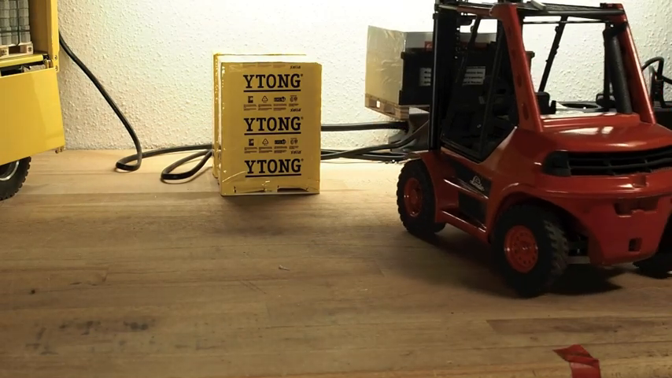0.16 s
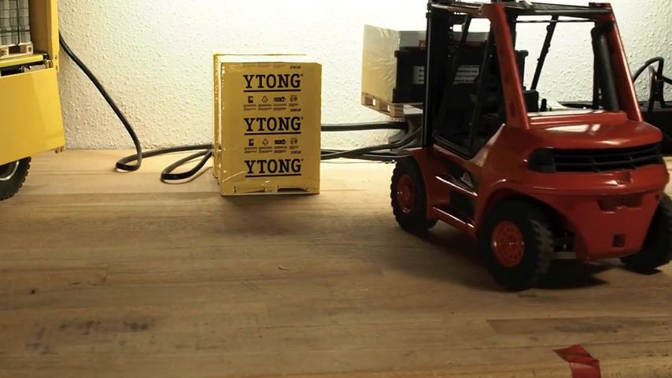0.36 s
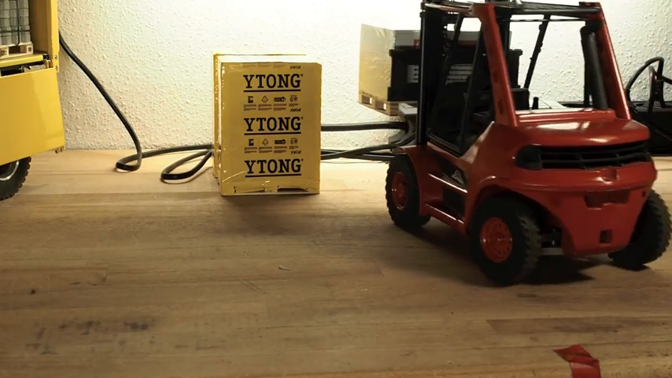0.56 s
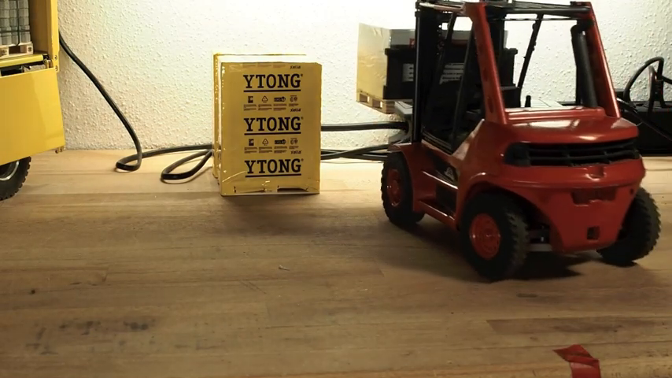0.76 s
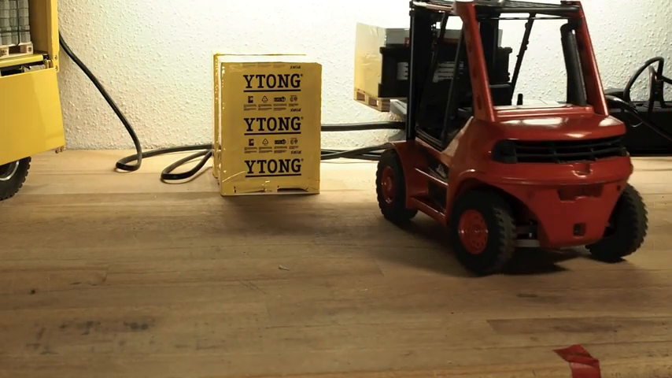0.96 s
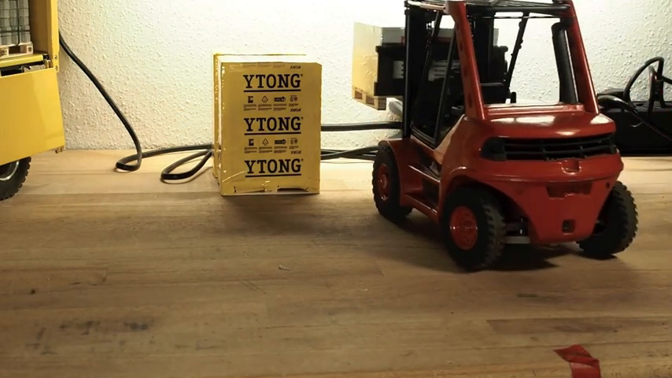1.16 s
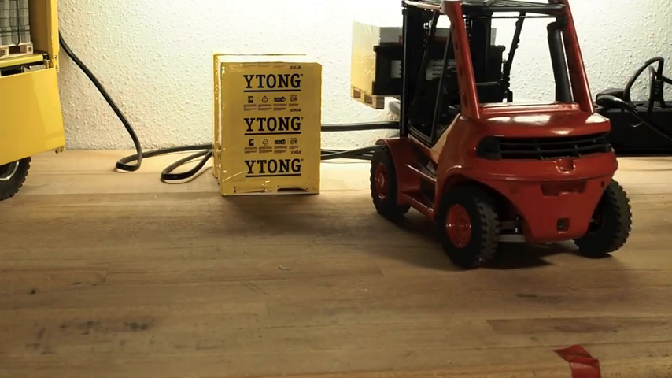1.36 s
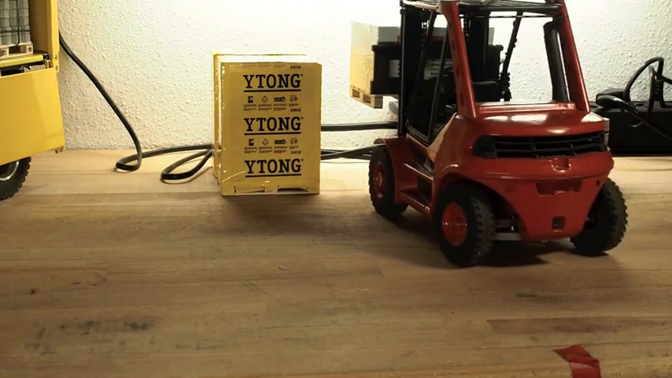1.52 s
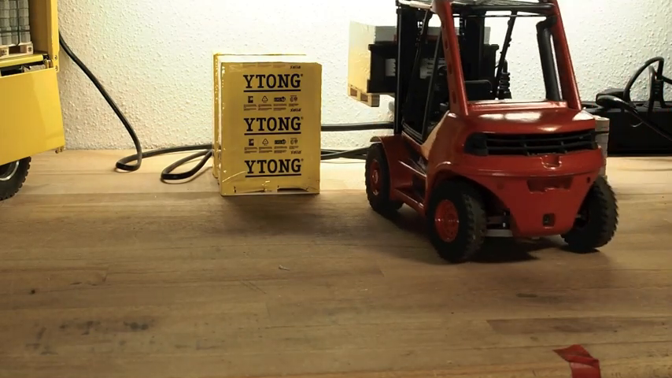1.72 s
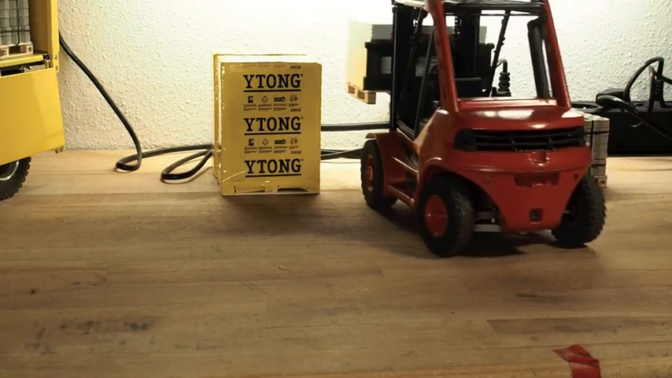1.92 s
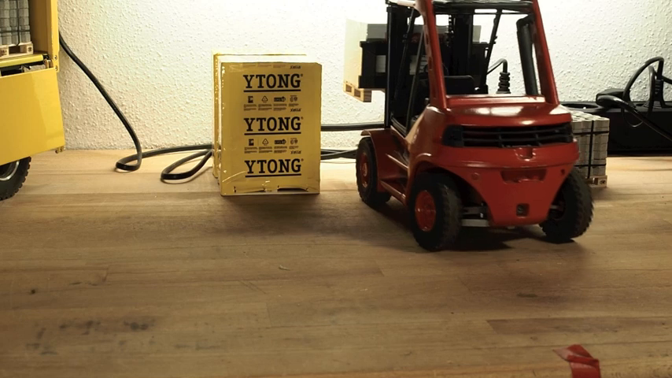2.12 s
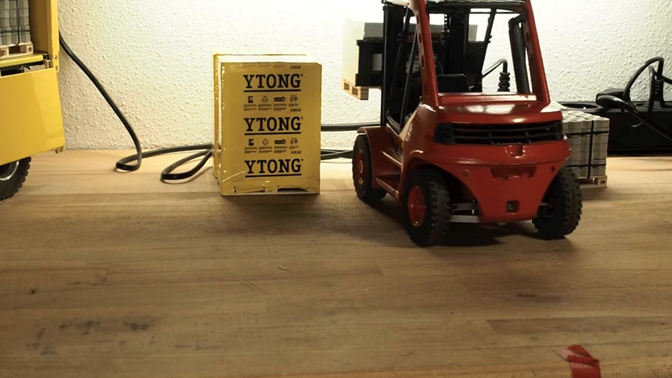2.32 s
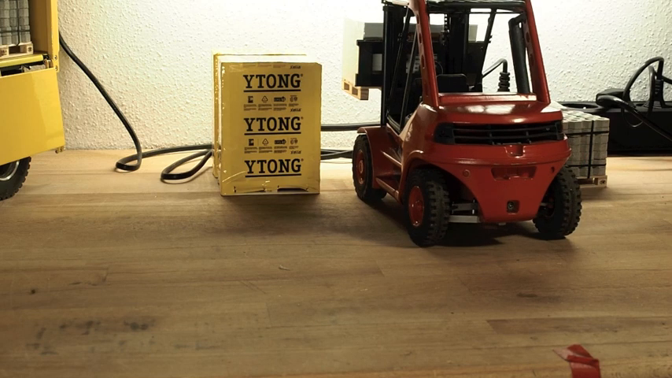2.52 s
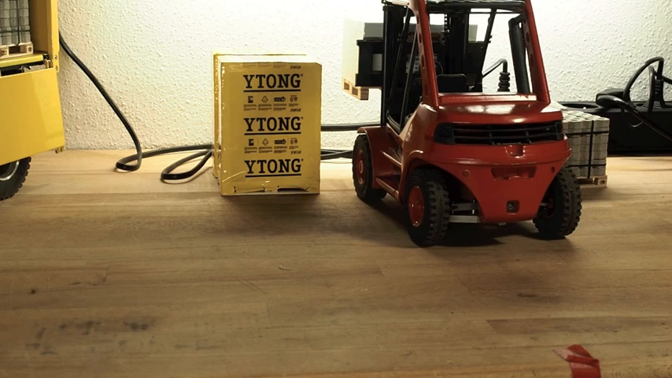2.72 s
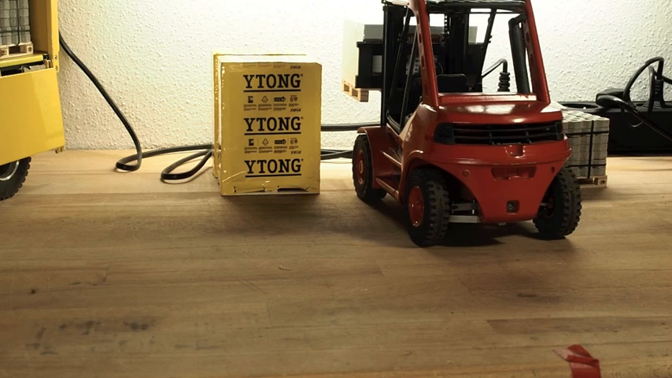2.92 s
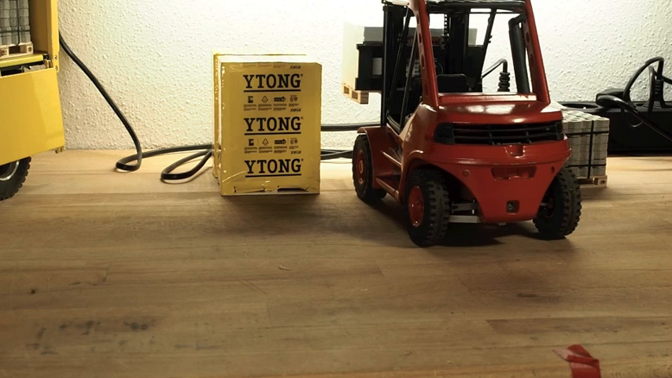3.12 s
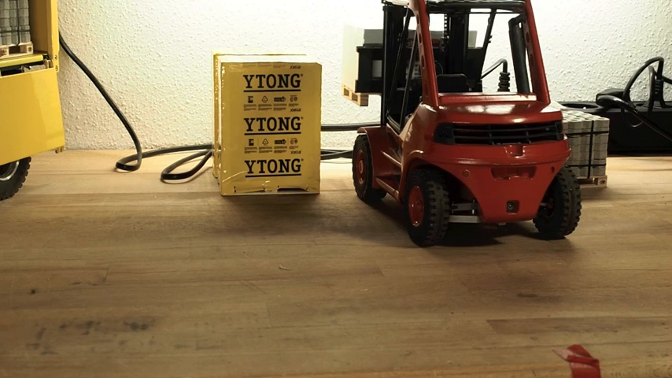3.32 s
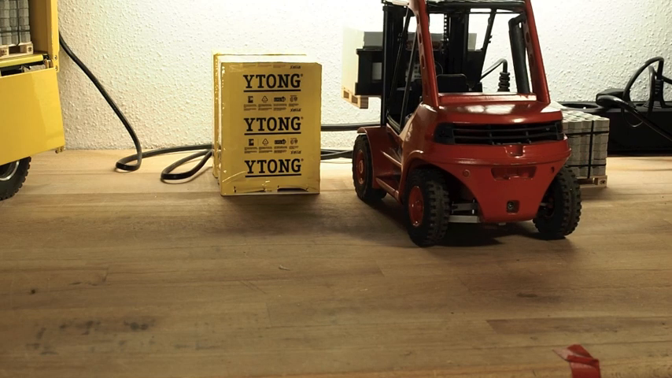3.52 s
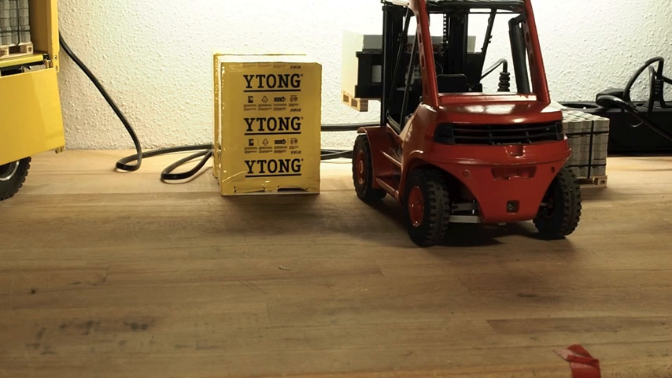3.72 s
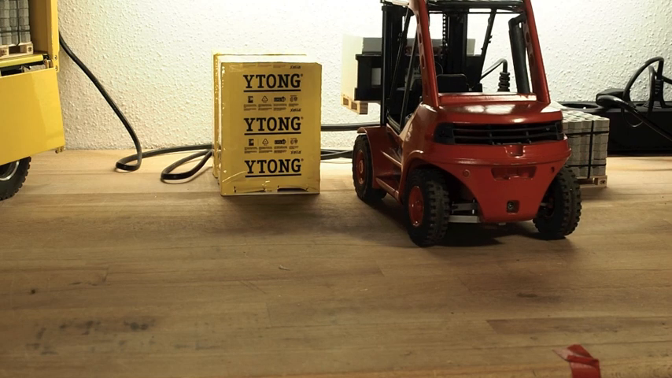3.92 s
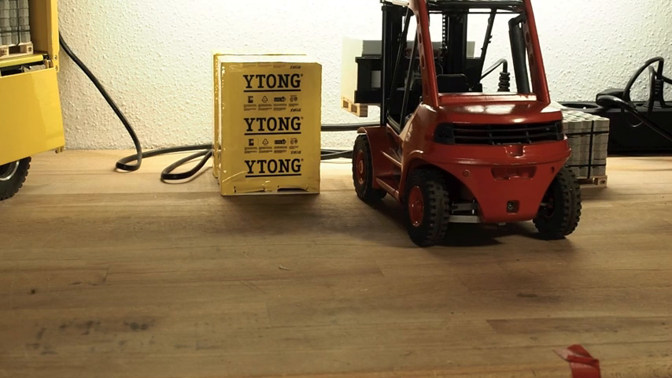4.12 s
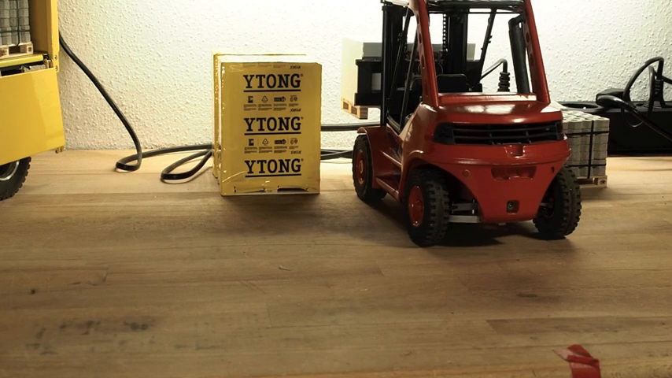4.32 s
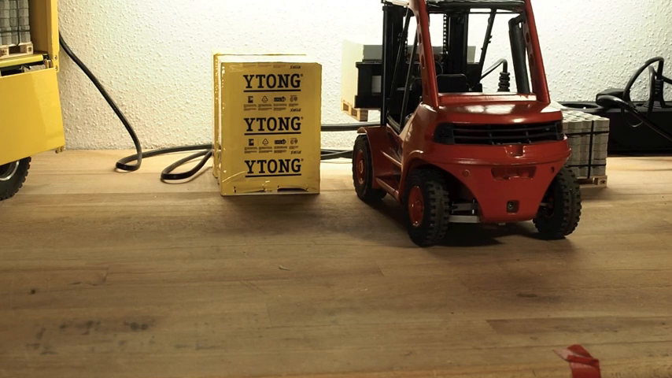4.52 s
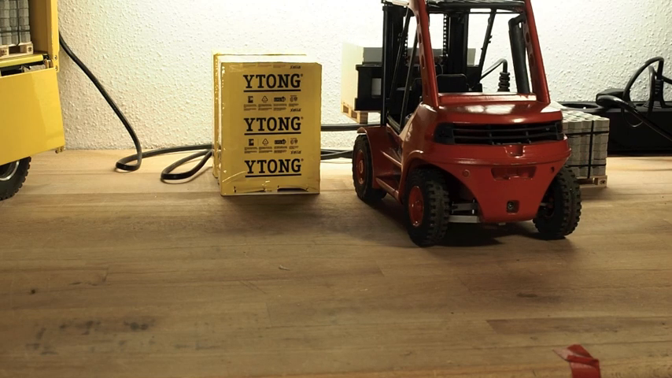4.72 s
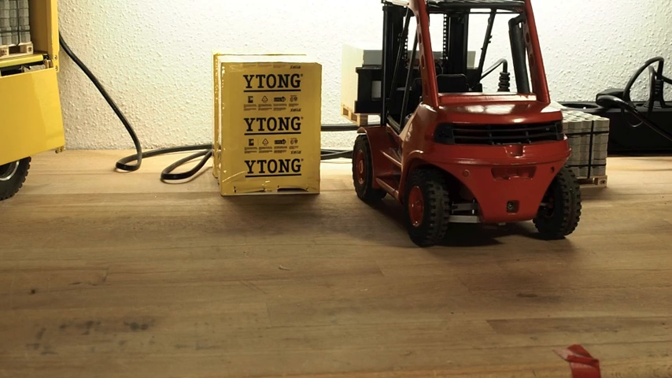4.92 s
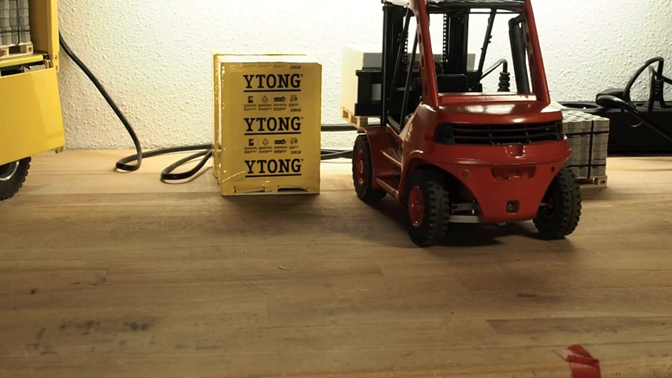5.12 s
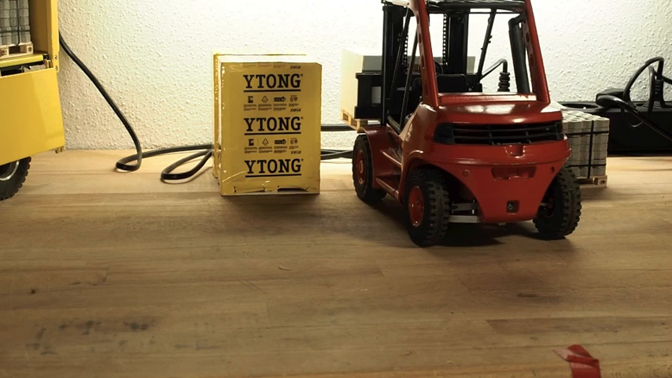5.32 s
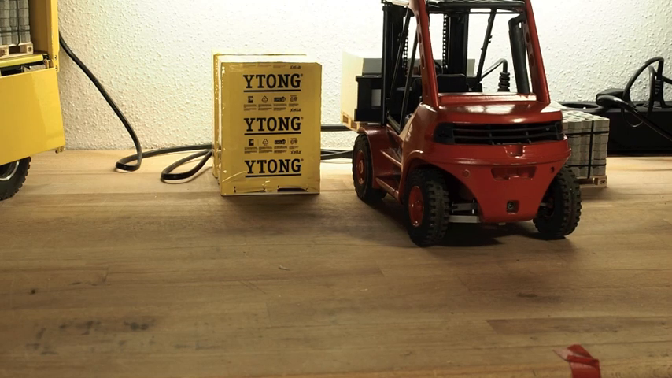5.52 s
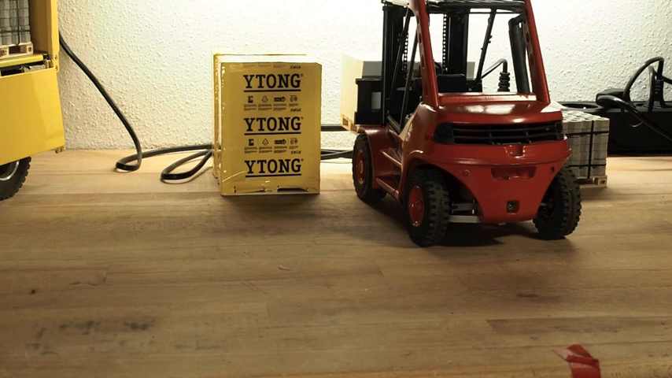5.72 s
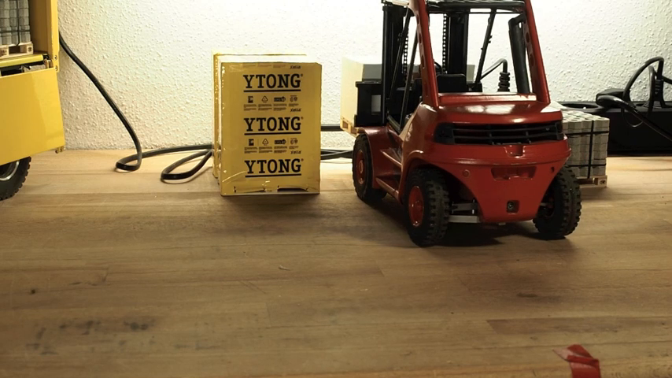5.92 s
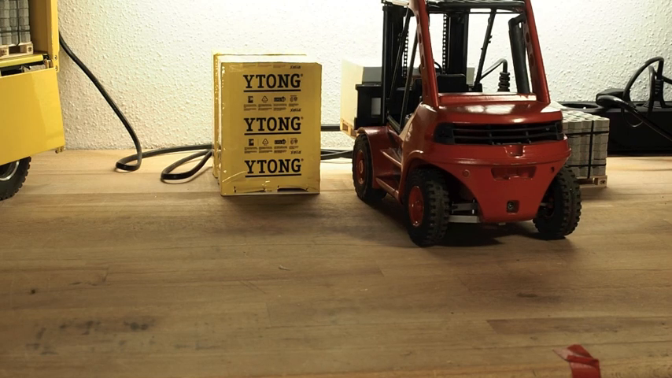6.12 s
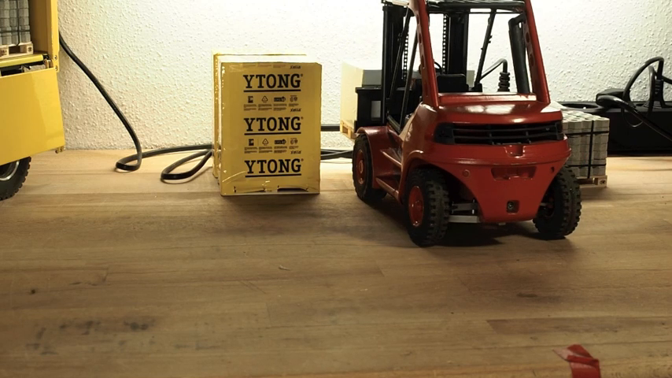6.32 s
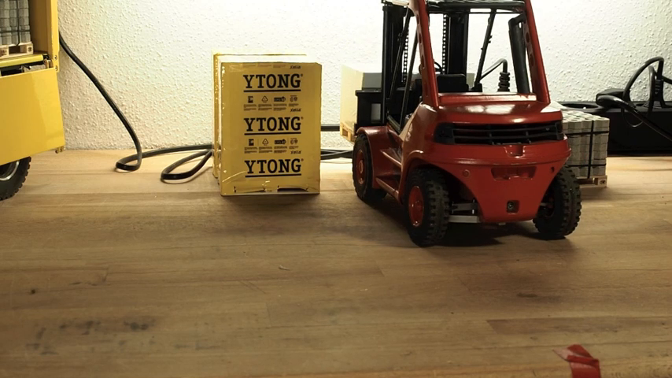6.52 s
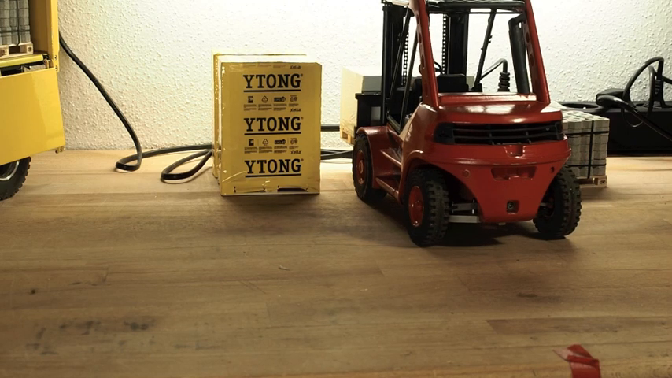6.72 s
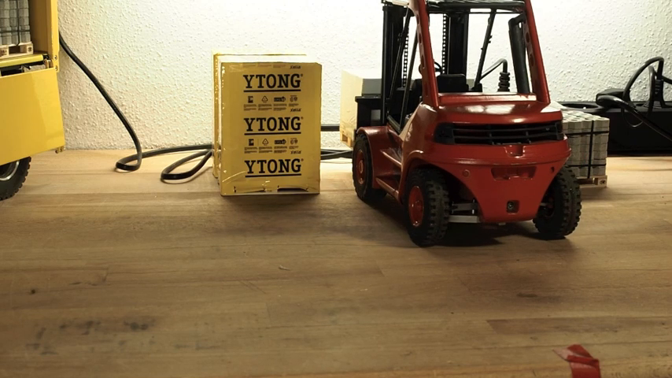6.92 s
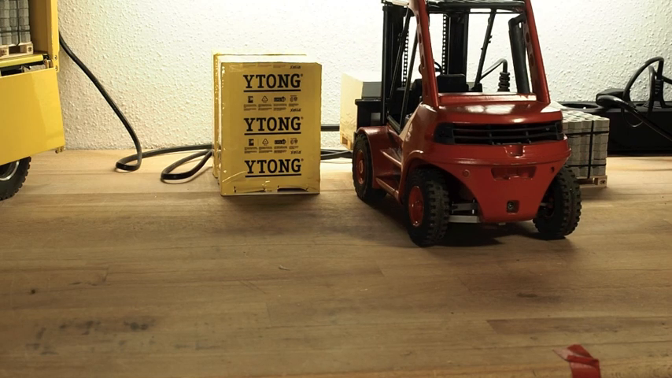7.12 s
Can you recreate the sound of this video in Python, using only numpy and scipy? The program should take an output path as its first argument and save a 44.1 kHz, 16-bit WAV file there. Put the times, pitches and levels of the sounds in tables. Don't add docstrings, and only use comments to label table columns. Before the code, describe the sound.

Close stereo pickup in a quiet small workshop. A radio-controlled toy forklift drives across a wooden bench with a harsh, uneven gear grind and nasal motor whine, loose parts ticking throughout and a tiny squeak. It stops after about two and a half seconds; a faint servo buzz remains. Sharp plastic clacks, then the lift motor starts and whirs, its gear whine slowly rising to the end.

```python
import sys
import numpy as np
from scipy import signal
from scipy.fft import rfft, irfft, next_fast_len
from scipy.io import wavfile
from scipy.ndimage import map_coordinates

SR = 44100
rng = np.random.default_rng(int(sys.argv[2]) if len(sys.argv) > 2 else 0)


def field_ratio(decibels):
    return 10 ** (np.asarray(decibels, dtype=float) / 20)


def transcribe(u):
    v = np.clip(np.atleast_2d(u).T, -1, 1)
    q = np.round(v * 32767).astype(np.int16)
    wavfile.write(sys.argv[1], SR, q)


N = 316197
TIME = np.arange(N) / SR

# (time [s], torque level [dB], rolling level [dB])
DRIVE = [(0, -45.5, -50), (.08, -51, -52), (.22, -43.5, -45), (.26, -44, -42.5), (.64, -39.5, -43),
         (.73, -41, -45.5), (.85, -42.5, -42), (1.16, -45, -45), (1.27, -48, -49), (1.45, -41, -54),
         (1.58, -48, -49), (1.75, -45, -43.5), (2.1, -49.5, -42.5), (2.2, -47, -39), (2.25, -44.5, -46),
         (2.38, -57, -46.5), (2.46, -67, -73)]
# (time [s], extra torque [dB])
SURGES = [(.05, 6.5), (.14, 4), (.56, 8), (.77, -0.5), (1.25, 12), (1.365, 2.5), (1.48, 3.5), (1.59, 9.5),
          (1.67, 3), (1.8, 11), (1.98, 6)]
SURGE_HALF_S = 0.016
# (time [s], frequency [Hz])
AXLE_HZ = [(0, 1362), (.6, 1380), (1.1, 1385), (1.25, 1358), (1.55, 1356), (1.85, 1398), (2.3, 1392)]
# (frequency [Hz], width [Hz], level [dB])
AXLE_MODES = [(1381, 30, -9), (1400, 110, -14)]
# (frequency [Hz], width [Hz], level [dB])
CHASSIS_MODES = [(606, 36, -21), (770, 32, -7.5), (989, 36, 1), (1205, 205, -3.5), (1534, 50, 5.5),
                 (1753, 56, -1), (2049, 14.5, 0), (2190, 55, -5.5), (2834, 82, -9.5), (3280, 23, -8.5),
                 (4080, 32, -14), (4320, 40, -33)]
# (frequency [Hz], density [dB per Hz])
GRIND = [(450, -36), (650, -7), (1000, -3), (1500, 6.5), (2000, -6.5), (3000, -22), (4600, -29.5),
         (5300, -39), (9000, -46), (12000, -54), (15500, -64)]
# (time [s], extra grind [dB])
BUMPS = [(1.65, 3), (1.678, 4), (1.716, 4), (1.835, 3.5), (1.875, 2.7), (1.92, 5), (1.982, 8), (2.045, 3),
         (2.205, 1.8), (2.325, 7.6)]
BUMP_HALF_S = 0.0083
# (multiple [-], level [dB])
CHOPPER = [(1, -11.5), (2, 7), (3, -2), (4, 1.5), (5, -16), (6, -13), (7, -15.5), (12, -20)]
CHOP_HZ, FRAME_HZ = 664.9, 49.95
CHOP_DB, CHOP_FOLLOWS = -56, 0.35
HISS_DB, HISS_FOLLOWS = -51, 1.8
JOLT_DB, JOLT_T60_S = -14, 0.34

# (time [s], shaft speed [Hz], strain on the mast [dB])
LIFT = [(2.795, 88.1, -42), (3.02, 91.96, -41), (3.36, 97.9, -43), (3.62, 104.3, -43.5), (3.82, 106.8, -44),
        (3.86, 108.7, -46.5), (4.02, 109.5, -46), (4.09, 112.5, -46), (4.29, 110.4, -46.5),
        (4.5, 110.9, -44), (4.57, 107.9, -42.5), (4.77, 109.1, -43.5), (4.96, 114.9, -43.5),
        (5.52, 117.5, -43.5), (5.64, 121.3, -41.5), (6.35, 123.1, -41), (6.41, 125.9, -41),
        (7.17, 127, -42)]
LIFT_ON_S, SPIN_UP_S, SPIN_LAG = 2.795, 0.034, 0.5
# (time [s], extra speed [Hz])
SLACKS = [(2.96, 2.6), (3.1, 1.6), (3.3, 2.3), (3.42, 1.8), (3.6, 1.8), (3.7, 2), (3.96, 1.4), (4.18, .8),
          (4.38, 1), (4.525, 2.4), (4.8, 1.2), (5.07, 3.4), (5.125, -1.3), (5.19, 1), (5.34, 1.9),
          (5.45, 1.8), (5.575, 2.8), (5.63, -1), (5.67, 1.6), (5.75, .9), (5.82, 1.6), (5.94, 1.4),
          (6.02, -1.2), (6.07, 1.8), (6.27, -1.2), (6.155, 3.3), (6.31, 1), (6.41, 1.8), (6.55, 1),
          (6.64, 1.8), (6.77, 1.8), (6.89, 1.7), (7.0, 1.5), (7.1, 2.6)]
SLACK_HALF_S = 0.03
TEETH = 14
MESH = {7 / 14: [(700, -66), (755, -62), (780, -62), (797, -52), (815, -62), (860, -66)],
        15 / 14: [(1450, -62), (1560, -50), (1620, -56), (1665, -45), (1710, -50), (1750, -45), (1790, -52),
        (1900, -54)], 9 / 14: [(900, -66), (965, -58), (985, -48), (1020, -48), (1045, -56), (1080, -66)],
        10 / 14: [(1100, -66), (1150, -53), (1200, -50), (1230, -58), (1260, -66)], 1: [(1290, -68),
        (1385, -54), (1490, -44), (1520, -42), (1545, -56), (1575, -44), (1650, -40), (1790, -40)],
        2: [(1500, -46), (2150, -42), (2300, -48), (2480, -44), (2560, -45), (2600, -48), (2640, -42),
        (2970, -38), (3040, -44), (3090, -46), (3150, -42), (3300, -48), (3560, -39)], 3: [(3900, -64),
        (4250, -52), (4440, -46), (4500, -54), (4560, -52), (4630, -60), (4760, -58), (4950, -47),
        (5150, -52), (5350, -56)], 4: [(5000, -62), (5500, -57), (5900, -58), (6200, -53), (6500, -49),
        (6750, -58), (7200, -56)], 5: [(7000, -64), (7700, -60), (8050, -50), (8400, -50), (8600, -57),
        (9000, -58)], 6: [(7400, -64), (8000, -48), (8250, -55), (8600, -51), (8900, -51), (9050, -54),
        (9250, -57), (9600, -60), (10400, -52), (10750, -54)]}
# (time [s], first order [dB], upper orders [dB])
BITES = [(3.04, 0, 5), (3.1, 3, 2.5), (3.24, 15, 1.5), (3.47, 3, 2), (3.515, 3, -7), (3.72, 4.5, 4.5),
         (3.8, -7, 2.5), (3.87, -15, -8), (4.02, -4, -6), (4.2, 4, 3.5), (4.28, -4, -6), (4.43, -8, -6),
         (4.52, 2, -2), (4.65, 4.5, 3), (4.73, 3, -8), (4.82, -3, -14), (4.9, -9, -9), (5.07, 5, -2.5),
         (5.2, -1, -1), (5.33, 5.5, 0), (5.47, 4, -4), (5.62, -1, -7), (5.78, -7, -6), (6.08, 0.5, 3),
         (6.25, -10, -7), (6.35, -3.5, 1), (6.66, -5, -2), (6.78, -11, -3), (6.91, -10, -3.5),
         (7.04, -9, 0)]
BITE_HALF_S = 0.024
CHATTER = 0.0009
# (shaft order [-], level [dB])
SHAFT = [(10, -57.5), (11, -54), (12, -56), (13, -56), (16, -51), (22, -57.5), (26, -52.5), (27, -53),
         (29, -49), (41, -57), (44, -60)]
ORDERS_FLOOR_DB, SEAT_S = -15, 0.8
# (frequency [Hz], width [Hz], level [dB])
MAST_MODES = [(769, 22, 4.5), (1004.7, 24, 9), (1183, 18, -3), (1383, 120, 4), (1677, 127, 0),
              (2367, 29, 8.5), (2900, 220, -7), (4560, 72, 2), (8100, 220, -17), (9440, 140, 3),
              (10840, 88, -4), (11380, 170, 4), (14100, 300, -9)]
# (frequency [Hz], density [dB per Hz])
BRUSHES = [(350, -100), (550, -19), (800, -16), (1200, -4.5), (1700, -11.5), (2000, -9.5), (3000, -10),
           (4300, -8.5), (5900, -9), (8000, -5.5), (11300, -5), (14000, -10.5), (15800, -19)]
BRUSH_DB, BRUSH_DB_PER_HZ = -40.5, 0.108
# (shaft speed [Hz], level [dB])
BENCH = [(84, -66), (92, -63), (100, -56), (106, -64), (111, -56), (117, -60.5), (123, -62), (129, -63.5)]
# (time [s], change of shake [dB])
SHAKE_DIPS = [
    (3.8, -18),
    (6.0, -16),
    (6.39, -14),
    (6.72, -34),
]
DIP_HALF_S = 0.023

# (time [s], peak level [dB], brightness [dB])
RATTLES = [(0.091, -36.5, -9), (0.2526, -26, -18), (0.3318, -27, -19), (0.398, -29.5, -22),
           (0.4693, -28.5, -12), (0.4903, -45, -21), (0.5387, -40, -25), (0.7043, -33, -13),
           (0.746, -33, -9), (0.767, -33, -11), (0.788, -40, -2), (0.817, -53, -18), (0.861, -49, -20),
           (0.579, -40, -18), (0.605, -44, -10), (0.308, -40, -14), (1.012, -44, -14), (0.886, -30, -8),
           (0.977, -29, -13), (0.994, -35, -7), (1.061, -29.5, -11), (1.1088, -38, -14), (1.124, -37, -5),
           (1.2303, -35.5, -9), (1.295, -35.5, -11), (1.4805, -34.5, -12), (1.6711, -36, -22),
           (1.7185, -57, -21), (1.7993, -50, -23), (1.8562, -32, -22), (1.9634, -47, -22),
           (2.0313, -46, -22), (2.1161, -36, -24), (2.199, -27, -9), (2.2628, -31, -23), (2.214, -34, -16),
           (2.228, -38, -18), (2.495, -43, -20), (2.5152, -40, -23), (1.597, -41, -16), (1.5, -43, -18)]
# (frequency [Hz], width [Hz], level [dB])
DULL_MODES = [(2570, 290, -3), (3760, 1120, 2.0), (4350, 440, 6), (4910, 350, -5.0)]
BRIGHT_MODES = [(6530, 1200, 3), (10400, 2700, -30)]
# (time [s], level [dB], frequency [Hz], length [s])
SQUEAKS = [
    (1.222, -47.5, 7200, 0.018),
    (1.283, -39, 7450, 0.0085),
    (1.29, -41, 7300, 0.017),
    (1.312, -51, 7460, 0.015),
]
# (time [s], peak level [dB], knock re peak [dB])
CLACKS = [
    (2.6954, -24.5, -32),
    (2.6975, -23.5, -26),
    (2.702, -34, -28),
    (2.795, -32, -5),
    (2.811, -48.5, 23),
    (2.817, -40, 22.5),
    (2.8767, -27.5, 3),
    (2.947, -31, 6),
    (3.04, -30, 0),
    (3.5018, -30, 0),
]
# (frequency [Hz], density [dB])
SNAP = [(1200, -22), (2200, -11), (3200, -4), (4400, 2.5), (8000, -1.5), (13000, -2.5), (15500, -12)]
# (frequency [Hz], width [Hz], level [dB])
SERVO_MODES = [(1773, 41, -5), (2405, 40, -11), (2640, 66, -6), (3320, 40, -16), (3750, 45, -11)]
# (start [s], end [s], frequency [Hz], level [dB], unrest [1/s])
RINGS = [(2.88, 3.38, 2360, -44.5, 150), (2.86, 3.4, 2850, -43, 200), (3.46, 3.6, 4300, -41, 20),
         (4.54, 4.82, 4800, -51, 40), (2.86, 3.55, 4450, -50, 330), (3.56, 3.74, 4500, -41, 120),
         (2.9, 3.5, 7600, -51.5, 160), (2.86, 3.3, 1100, -58, 140), (2.86, 3.25, 200, -62, 53),
         (4.05, 4.47, 8000, -45, 90), (4.15, 4.4, 8600, -48, 120), (4.44, 4.9, 9280, -48, 120),
         (4.46, 4.86, 765, -53, 11), (4.58, 4.8, 1100, -49.5, 22), (5.55, 5.85, 1200, -52, 40),
         (4.9, 5.2, 8100, -50, 150), (4.95, 5.2, 11300, -50, 240), (6.38, 7.3, 1190, -49, 20),
         (4.05, 5.7, 635, -62, 15), (5.06, 5.55, 775, -56, 40), (1.9, 2.3, 1535, -43, 50),
         (0.22, 1.17, 5000, -59.5, 60), (4.2, 5.5, 4470, -56, 60)]

# (frequency [Hz], density [dB per Hz])
AIR = [(35, -22), (60, -8), (406, -2.5), (563, -9), (1500, -8.5), (1760, -11), (1940, -6.5), (2690, -8.5),
       (6220, -21.5), (15800, -23.5)]
# (frequency [Hz], side re mid [dB])
WIDTH = [(60, -9), (110, -29), (200, -3), (380, -22), (700, -7), (1290, -2.5), (2380, 1), (4400, 5),
         (8120, 4.5), (15000, 4)]
# (frequency [Hz], left re right [dB])
LEAN = [(60, -0.38), (110, -0.89), (200, -0.88), (380, -0.5), (700, -1.3), (1290, -0.93), (2380, -1.4),
        (4400, -0.9), (8120, 0.073), (15000, -0.13)]
DRIVE_RIGHT = 0.024


def drive():
    axle_db, grind_db, chop_db, hiss_db = drive_levels()
    frames = 1 + 0.42 * np.cos(2 * np.pi * FRAME_HZ * TIME)
    teeth = rng.standard_normal((2, N)) * field_ratio(0.42 * wobble(24.2) + 1.15 * wobble(300))

    whine = tone(np.cumsum(curves(AXLE_HZ)[0]) / SR, flutter_db=1.8, rate=25)
    axle = 0.45 * unit(filtered(teeth[0], body(AXLE_MODES, between_db=-74.5))) + 0.95 * whine
    axle = axle * (1.17 + 0.063 * frames)

    chassis = body(CHASSIS_MODES, between_db=-40)
    ringing = unit(filtered(teeth[1], lambda f: chassis(f) * np.clip(f / 700, 0, 1) ** 2))

    grit = rng.standard_normal((2, N)) * field_ratio(0.88 * wobble(31.5) + 4.7 * wobble(500))
    treble = lambda f: np.clip((f - 1900) / 1200, 0, 1)
    low, high = filtered(grit, lambda f: field_ratio(along(GRIND, f)) * [1 - treble(f), treble(f)])

    rolling = field_ratio(grind_db + 3.5 + swells(BUMPS, BUMP_HALF_S)) * (0.96 * ringing + 0.42 * unit(low))
    grind = field_ratio(axle_db - 1.0) * axle + rolling + field_ratio(hiss_db - 3.5) * unit(high)
    chop = sum(field_ratio(db) * tone(k * CHOP_HZ * TIME, flutter_db=1.0, rate=13.86) for k, db in CHOPPER)
    chop = field_ratio(chop_db - 2.5) * (1.06 + 0.6 * frames) * chop
    return fade(-1, 2.46, soft=0.055) * (grind + chop)


def drive_levels():
    torque_db, rolling_db = curves(DRIVE)
    torque_db = torque_db + swells(SURGES, SURGE_HALF_S)
    jolts = np.zeros(N)
    for s, db, _ in RATTLES:
        add(jolts, s, db + JOLT_DB, t60=JOLT_T60_S)
    hiss = np.hypot(field_ratio(HISS_DB + HISS_FOLLOWS * (rolling_db + 45)), jolts)
    chop_db = CHOP_DB + CHOP_FOLLOWS * (torque_db + 40)
    return torque_db, rolling_db, chop_db, 20 * np.log10(hiss)


def lift():
    speed_hz, strain_db = shaft()
    turns = np.cumsum(speed_hz * (1 + 0.002103 * wobble(70) + CHATTER * wobble(250))) / SR
    parts = gear_mesh(speed_hz, turns) + shaft_orders(turns, strain_db)
    parts = parts + brush_noise(speed_hz, turns, strain_db) + unbalance(speed_hz, turns)
    return fade(2.793, 9, soft=0.024) * parts


def shaft():
    steady_hz, strain_db = curves(LIFT)
    since_on = np.clip(TIME - LIFT_ON_S, 0, None)
    steady_hz = steady_hz * (1 - SPIN_LAG * np.exp(-since_on / SPIN_UP_S))
    return steady_hz + swells(SLACKS, SLACK_HALF_S), strain_db


def gear_mesh(speed_hz, turns):
    load = 1 + 0.033 * np.cos(2 * np.pi * turns / 5.3 + 1.14 * wobble(12.0))
    first_db, upper_db = (swells(np.array(BITES)[:, [0, c]], BITE_HALF_S) for c in (1, 2))
    loose_db = 1.2 * wobble(14)
    mesh = np.zeros(N)
    for k, path in MESH.items():
        if k == 1:
            bite_db = first_db
        else:
            bite_db = upper_db if k > 1.5 else loose_db
        level_db = along(path, TEETH * k * speed_hz) + bite_db - 2.0 - k / 4
        mesh += field_ratio(level_db) * tone(TEETH * k * turns, flutter_db=1.07 + 0.25 * k, rate=60)
    return load * mesh


def shaft_orders(turns, strain_db):
    orders = sum(field_ratio(db) * tone(k * turns, flutter_db=2, rate=15) for k, db in SHAFT)
    orders = filtered(orders, body(MAST_MODES, between_db=ORDERS_FLOOR_DB))
    return field_ratio(1.6 * (strain_db + 42.5)) * fade(2.88, 9, soft=SEAT_S) * orders


def brush_noise(speed_hz, turns, strain_db):
    hiss_db = BRUSH_DB + BRUSH_DB_PER_HZ * (speed_hz - 110) + 0.34 * (strain_db + 43.5)
    beat = 1 + 0.1 * np.cos(2 * np.pi * turns) + 0.15 * np.cos(4 * np.pi * turns)
    sparks = rng.standard_normal((2, N)) * beat * field_ratio(0.68 * wobble(600) + 0.78 * wobble(12))
    treble = lambda f: np.clip((f - 4600) / 1200, 0, 1)
    mast = body(MAST_MODES, between_db=-4)
    colour = lambda f: field_ratio(along(BRUSHES, f)) * mast(f)
    low, high = filtered(sparks, lambda f: colour(f) * [1 - treble(f), treble(f)])
    return field_ratio(strain_db + 1.6) * unit(low) + field_ratio(hiss_db) * unit(high)


def unbalance(speed_hz, turns):
    shake_db = along(BENCH, speed_hz) + swells(SHAKE_DIPS, DIP_HALF_S)
    shake = tone(turns, flutter_db=3, rate=27)
    shake += 0.3 * tone(2 * turns, flutter_db=3.0, rate=14)
    shake += 0.32 * tone(4 * turns, flutter_db=1.0, rate=14)
    return field_ratio(shake_db - 2.0) * shake


def rattles():
    dull, bright = np.zeros((2, N))
    for s, db, bright_db in RATTLES:
        add(dull, s, db - 13, t60=0.1)
        add(dull, s + 0.0066, db - 29, t60=0.032)
        add(bright, s, db + bright_db - 12.5, t60=0.073)
        add(bright, s, db + bright_db - 24, t60=0.24)
    ticks = dull * unit(filtered(rng.standard_normal(N), body(DULL_MODES, between_db=-59)))
    ticks += bright * unit(filtered(rng.standard_normal(N), body(BRIGHT_MODES, between_db=-40)))
    for s, db, hz, length in SQUEAKS:
        squeak = tone(hz * TIME, flutter_db=3.0, rate=200)
        ticks += field_ratio(db - 6.5) * fade(s, s + length, soft=0.004) * squeak
    return ticks


def clacks():
    snaps, knocks = np.zeros((2, N))
    for s, db, knock_db in CLACKS:
        add(snaps, s, db - 9.5, t60=0.017)
        add(snaps, s, db - 24.5, t60=0.2)
        add(knocks, s, db + knock_db - 3.5, t60=0.016)
    snap = unit(filtered(rng.standard_normal(N), lambda f: field_ratio(along(SNAP, f))))
    return snaps * snap + np.sin(2 * np.pi * 1640 * TIME) * knocks


def servo():
    frame = FRAME_HZ * (TIME - 0.015)
    since_kick = (frame % 1) / FRAME_HZ
    kicks = field_ratio(-60 * since_kick / 0.061 + 0.92 * wobble(30)) * rng.standard_normal(N)
    switch_on = np.diff(np.floor(frame), prepend=0)
    switch_off = np.diff(np.floor(frame - 0.076), prepend=-1)
    clicks = (switch_on + 0.6 * switch_off) * field_ratio(1.5 * wobble(20))
    modes = body(SERVO_MODES, between_db=-34)
    case = lambda f: modes(f) * np.clip((6000 - f) / 2000, 0, 1)
    return field_ratio(-56.0) * unit(filtered(0.4 * unit(kicks) + unit(clicks), case))


def rings():
    out = np.zeros(N)
    for s, end, hz, db, rate in RINGS:
        on = slice(round(s * SR), round(end * SR))
        t = TIME[on]
        edges = np.clip(np.minimum(t - s, end - t) / 0.04, 0, 1)
        out[on] += field_ratio(db) * edges * wobble(rate)[on] * np.sin(2 * np.pi * hz * t)
    return out


def room(x, t60):
    t = np.arange(SR // 2) / SR
    tail = rng.standard_normal(len(t)) * field_ratio(-60 * t / t60)
    return signal.fftconvolve(x, tail / np.linalg.norm(tail))[:N]


def workshop_air():
    noise = rng.standard_normal((2, N))
    return field_ratio(-54.5) * unit(filtered(noise, lambda f: field_ratio(along(AIR, f))))


def unit(x):
    return x / np.sqrt(np.mean(x ** 2) + 1e-20)


def along(points, hz):
    f, v = np.transpose(points)
    return np.interp(np.log(hz + 1), np.log(f + 1), v)


def curves(rows):
    s, *cols = np.transpose(rows)
    return [np.interp(TIME, s, c) for c in cols]


def wobble(rate):
    coarse = TIME[::16]
    knots = rng.standard_normal(int(N * rate / SR) + 4)
    return np.interp(TIME, coarse, map_coordinates(knots, [coarse * rate]))


def swells(rows, half_s):
    coarse = TIME[::32]
    bells = sum(db * np.exp(-((coarse - s) / half_s) ** 2) for s, db in rows)
    return np.interp(TIME, coarse, bells)


def fade(start, end, soft):
    return np.clip((TIME - start) / soft, 0, 1) * np.clip((end - TIME) / soft, 0, 1)


def add(track, start, db, t60):
    t = np.arange(SR // 4) / SR
    track[round(start * SR):][:len(t)] += field_ratio(db - 60 * t / t60) * np.clip(t / 0.0005, 0, 1)


def tone(turns, flutter_db, rate):
    flutter = np.exp(flutter_db * np.log(10) / 20 * wobble(rate))
    return np.sqrt(2) * flutter * np.sin(2 * np.pi * (turns + rng.random()))


def filtered(x, response):
    m = next_fast_len(N + SR // 2)
    return irfft(rfft(x, m) * response(np.fft.rfftfreq(m, 1 / SR)), m)[..., :N]


def body(modes, between_db):
    def response(f):
        total = field_ratio(between_db)
        for k, (centre, width, db) in enumerate(modes):
            damping = 1j * f * width
            total = total + (-1) ** k * field_ratio(db) * damping / (centre * centre - f * f + damping)
        return total
    return response


def scene():
    wheels = drive()
    model = wheels + lift() + rattles() + clacks() + servo() + rings()
    air = workshop_air()
    mid = model + field_ratio(-14) * room(model, t60=0.25) + air[0]
    scattered = filtered(room(model, t60=0.3), lambda f: field_ratio(along(WIDTH, f) - 7.0))
    side = scattered + field_ratio(-2.5) * air[1] - DRIVE_RIGHT * wheels
    return filtered(np.array([mid + side, mid - side]), lambda f: field_ratio(np.outer([0.5, -0.5], along(LEAN, f))))


def low_pass(x):
    return signal.sosfilt(signal.butter(12, 16510, fs=SR, output="sos"), x)


def record(dry):
    top_hz, offset = 15750, -0.0039
    mix = filtered(dry, lambda f: f < top_hz) + offset
    return low_pass(mix)


dry = scene()
out = record(dry)
transcribe(out)
```